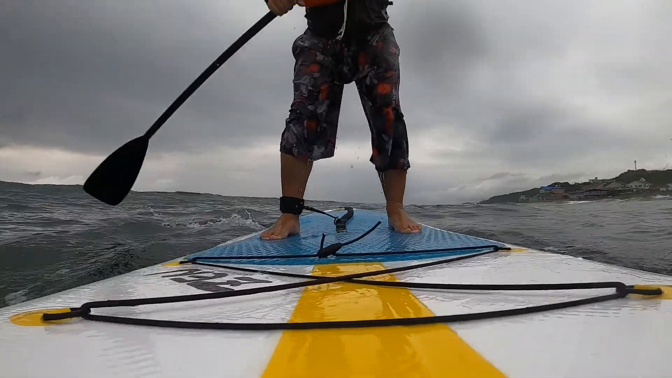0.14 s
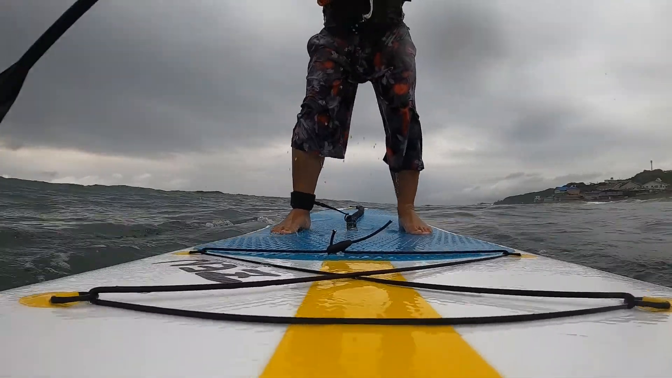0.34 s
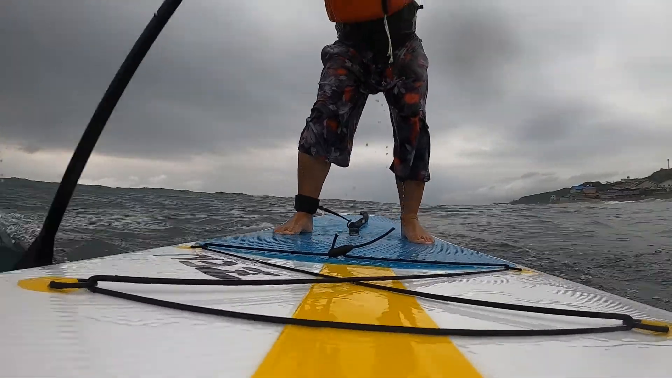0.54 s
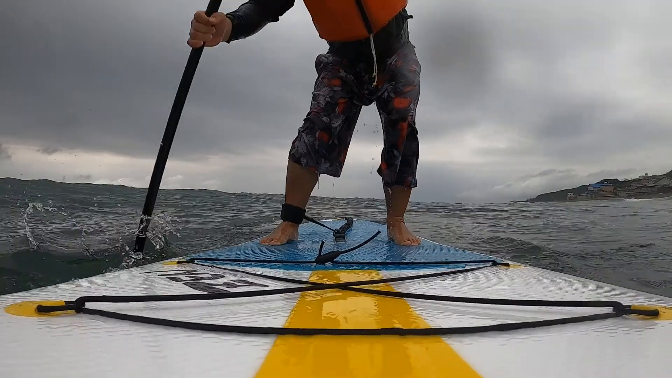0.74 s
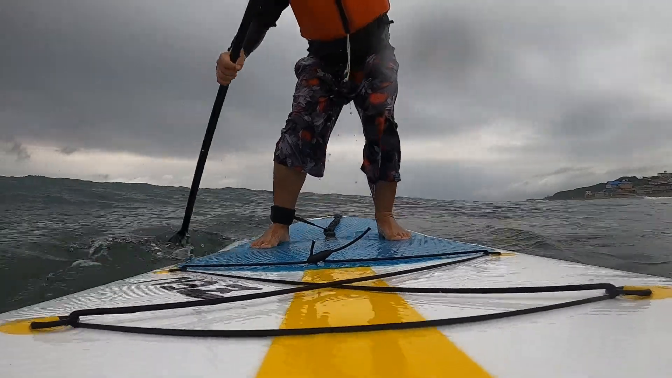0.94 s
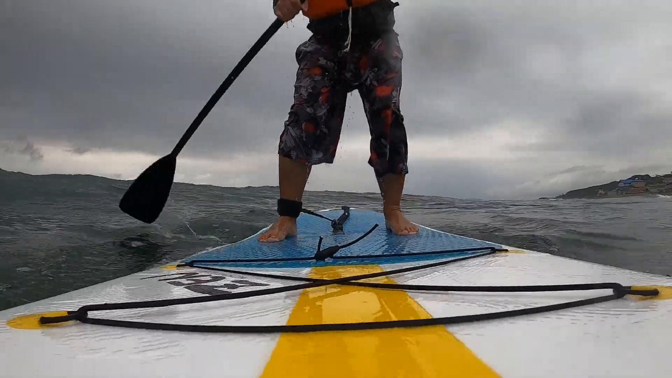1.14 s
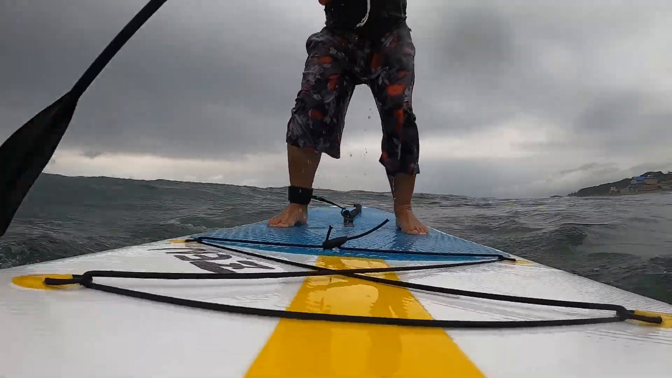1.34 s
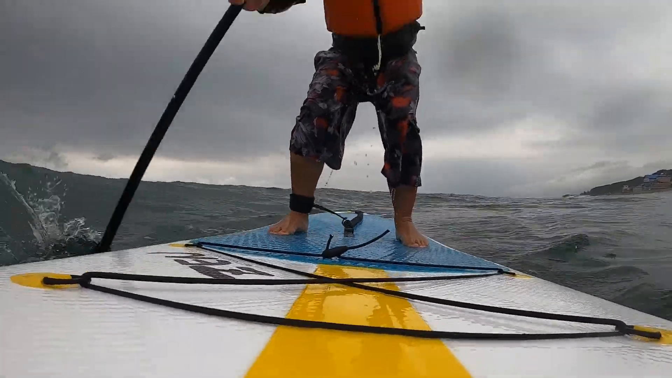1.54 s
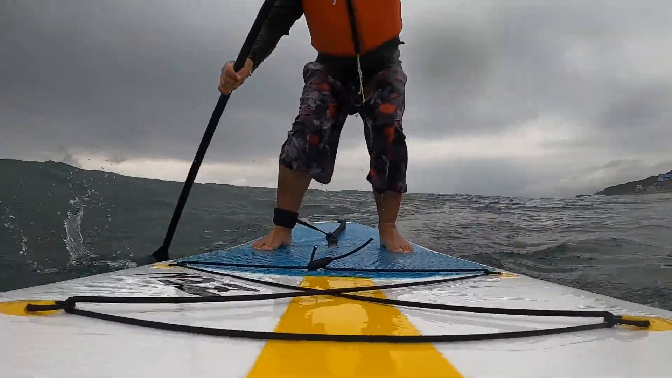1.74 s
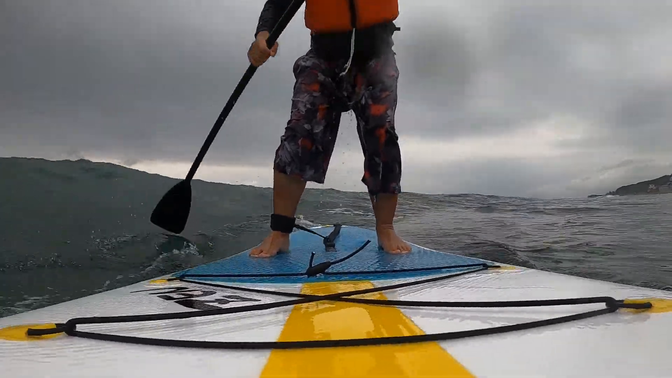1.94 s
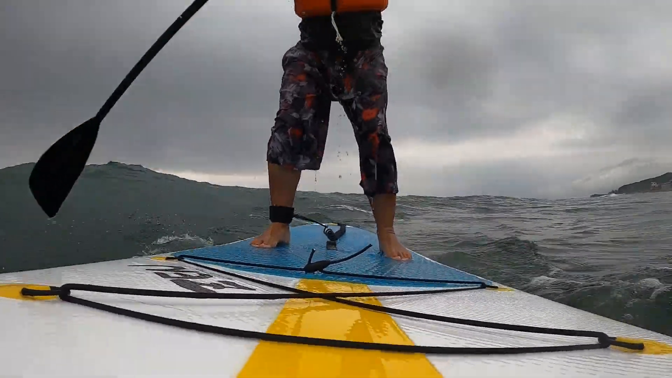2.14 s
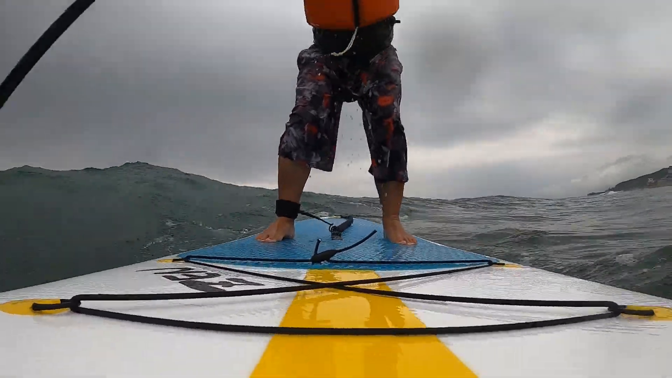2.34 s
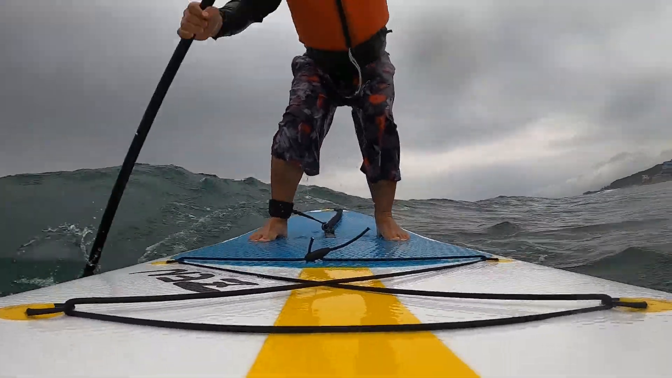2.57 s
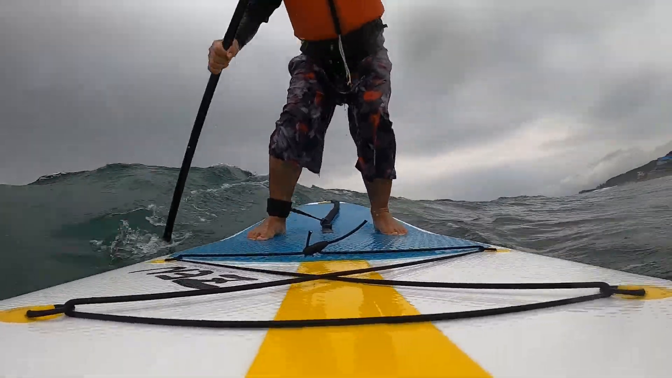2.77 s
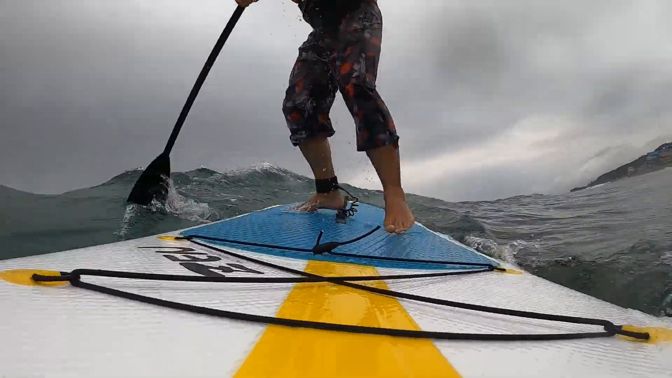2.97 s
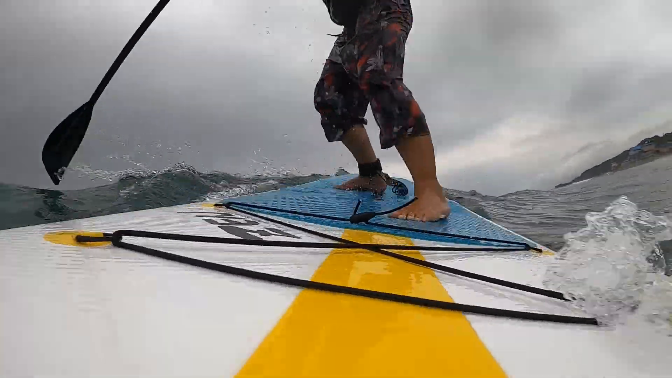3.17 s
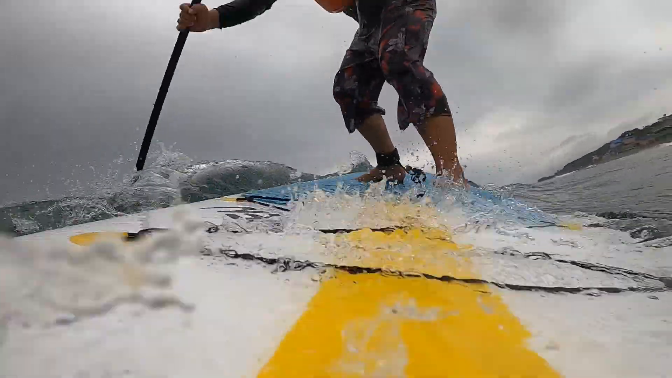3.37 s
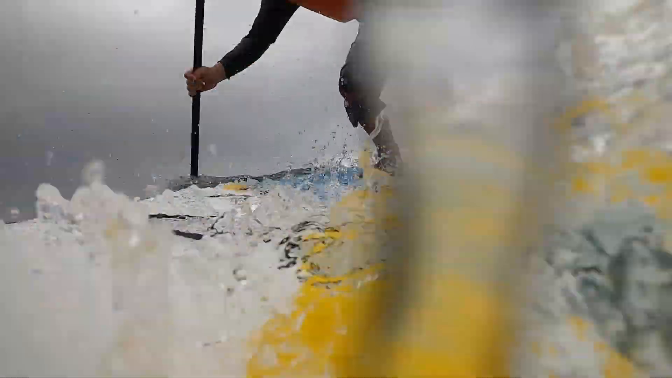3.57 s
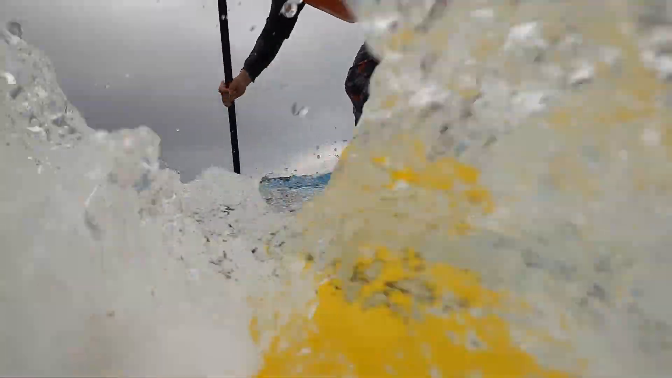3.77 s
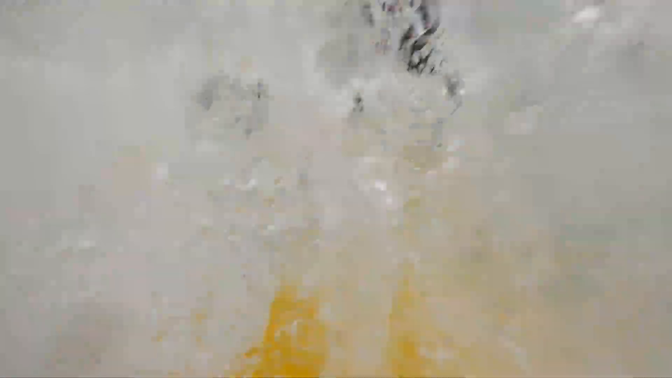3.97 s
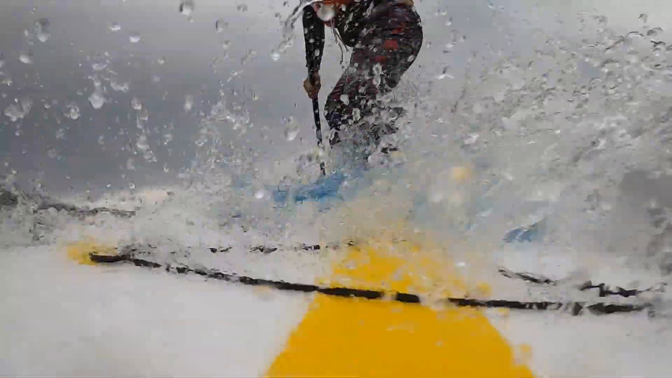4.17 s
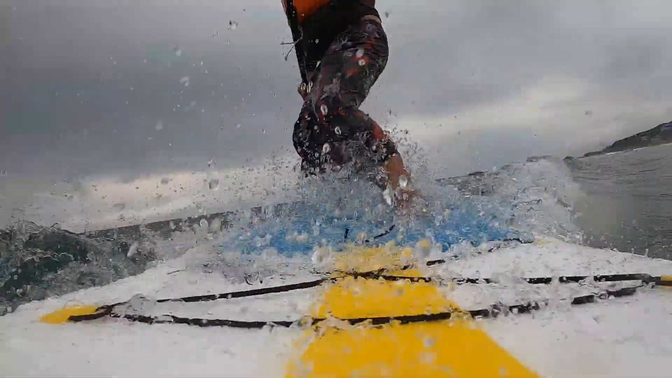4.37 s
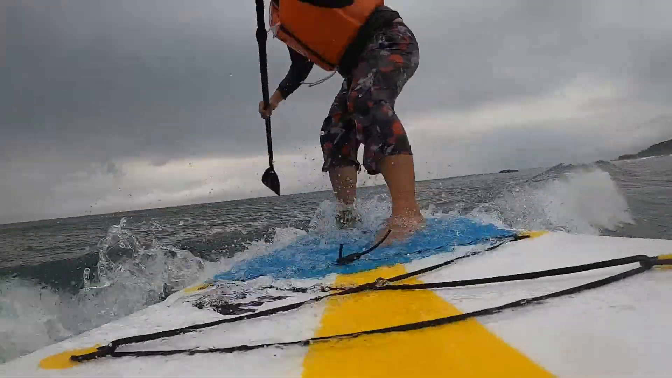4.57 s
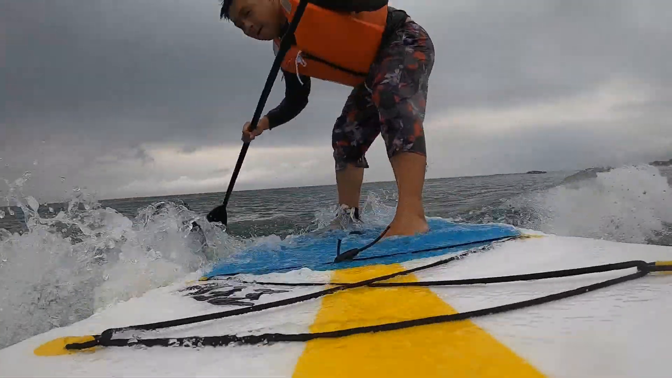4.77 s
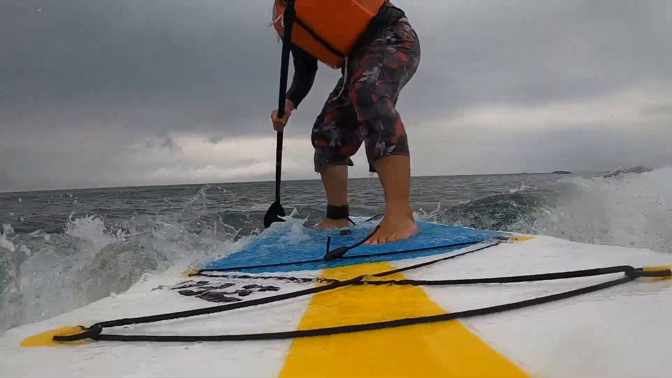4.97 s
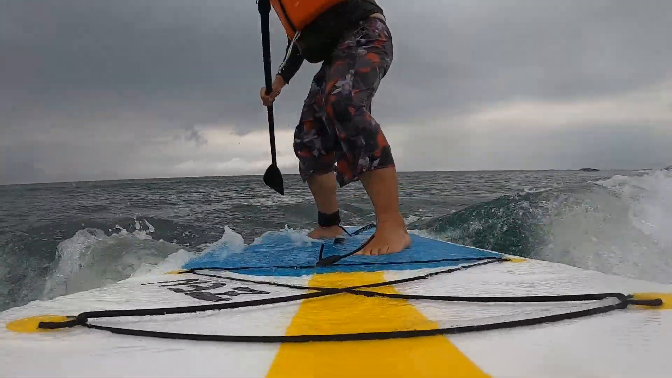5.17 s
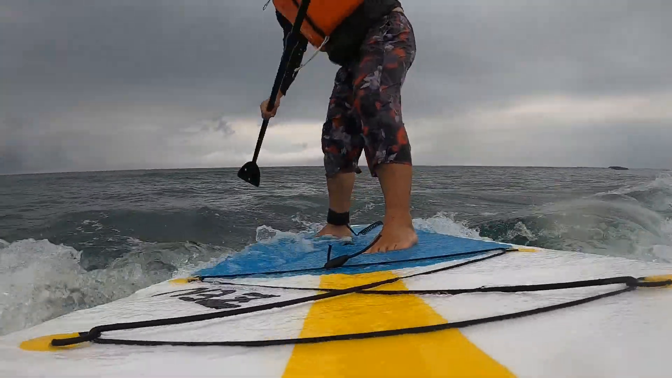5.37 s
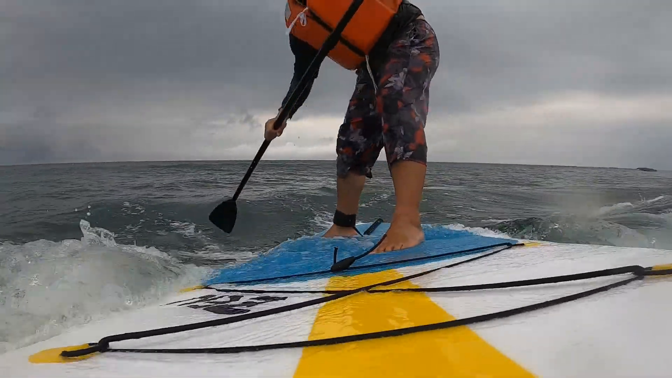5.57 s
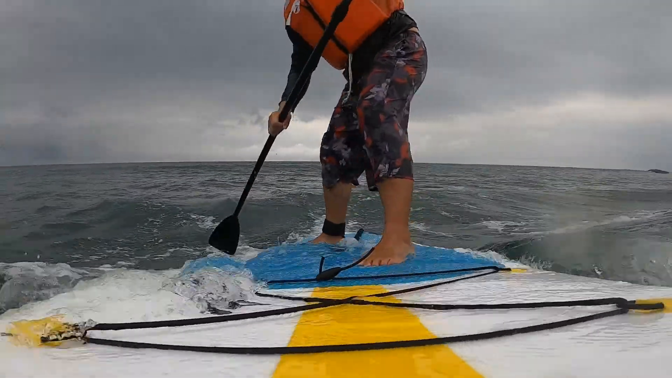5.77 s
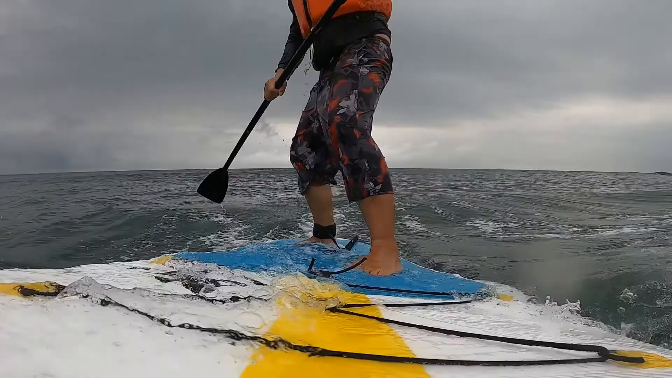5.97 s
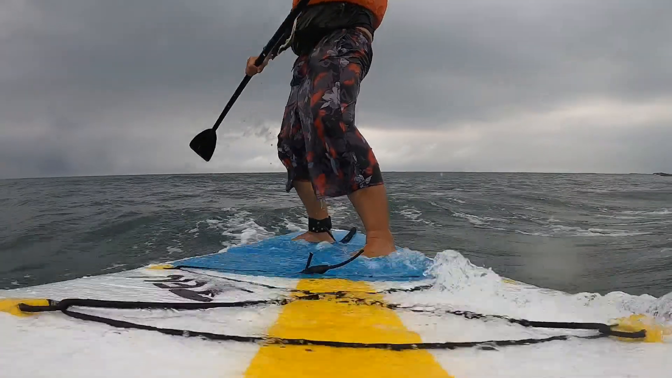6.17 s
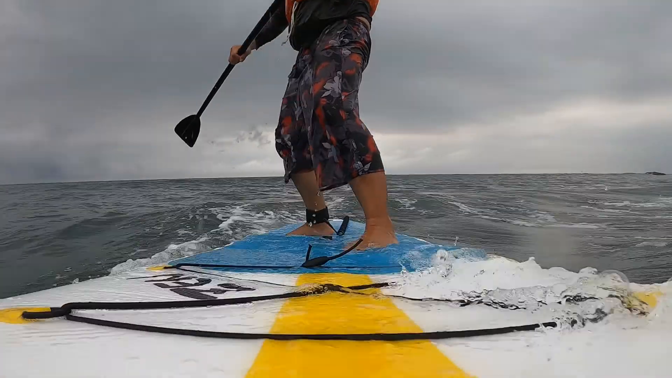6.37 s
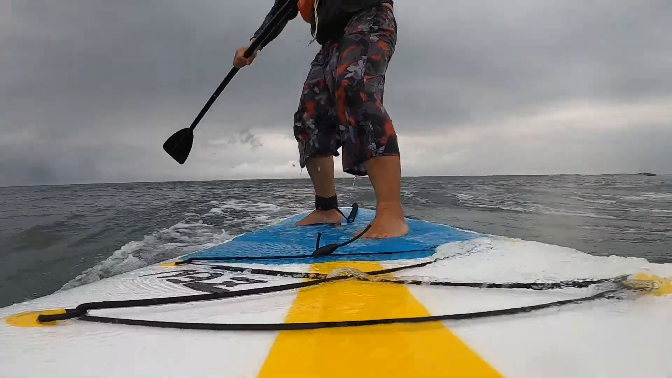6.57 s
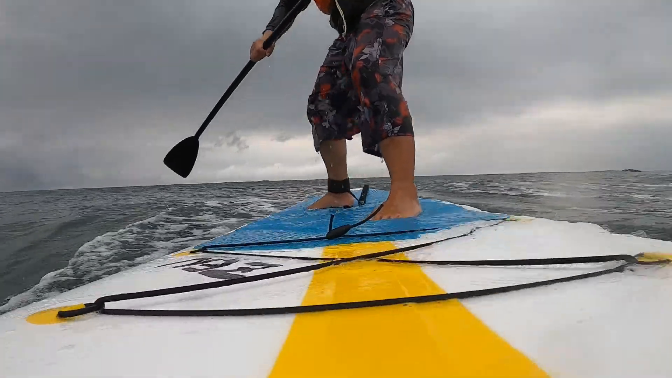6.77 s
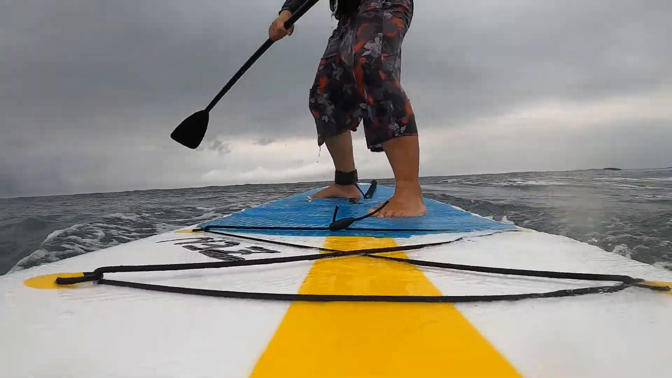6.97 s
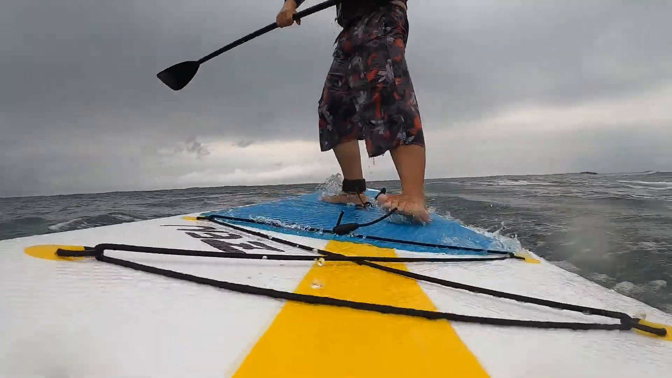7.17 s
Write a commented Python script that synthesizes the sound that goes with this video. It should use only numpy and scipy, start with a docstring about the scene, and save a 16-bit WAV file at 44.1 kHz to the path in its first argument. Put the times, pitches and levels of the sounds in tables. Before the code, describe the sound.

A microphone in a housing on the nose of a hollow paddleboard, outdoors on a choppy sea. From 0 to 3 seconds a mid-toned wash runs along the rails over uneven low drumming and gusty wind rumble. A hollow paddle plop comes at 0.2, bubbly surges and splashes around 1.0 to 1.3, smaller slaps near 1.6 to 1.9, another plop at 2.2, and hull gulps at 2.6 to 2.8. A fainter plop at 3.0 leads to the wave: from 3.35 sharp cracks, plinking drops and bright mist, a heavy slap near 3.67, then a dense fizzing surge around 4.0 to 4.1. By 4.3 tiny bubbles chirp upward and the treble has sunk. From 4.5 the muffled wash is quiet beneath wind and hollow thumps, notably 4.8 to 5.6 and 6.07. The wash gradually recovers, swelling at 6.7, with stronger drumming near 7 seconds and a last splash at the end.

```python
"""The hollow hull of a paddleboard drums under the water: shaped noise, and decaying tones for trapped air.
Wind buffets a microphone behind an open port in a housing on the nose; noise washes along the rails, foam fizzes.
A wave breaks over the nose: noise bursts make its splashes, ringing bubbles and drops its spray, grains its mist.
The wet ports muffle the wash until they drain; the recorder dulls the treble throughout."""
import sys
import numpy as np
from scipy import signal
from scipy.fft import rfft, irfft
from scipy.io import wavfile
from scipy.ndimage import uniform_filter1d

SR = 44100
rng = np.random.default_rng(int(sys.argv[2]) if len(sys.argv) > 2 else 0)


def put_to_file(sound):
    """Save the sound as 16-bit audio at rate SR, in the file named by the first command-line argument."""
    columns = np.atleast_2d(sound).T  # one column per channel
    safe = np.clip(columns, -1, 1)
    whole_steps = np.round(safe * 32767)
    wavfile.write(sys.argv[1], SR, whole_steps.astype(np.int16))


N = 317961
T = np.arange(N) / SR  # time of each sample [s]
F = np.arange(N // 2 + 1) * SR / N + 1e-3  # frequency of each bin [Hz], kept above zero for the logarithms
WAVE_START_S, WAVE_END_S = 3.3, 4.35  # while the wave is over the nose
PORT_FILLS_S = 3.42  # water fills the open microphone port


def undb(db):
    """Amplitude gain is ten to the power of a twentieth of the decibels."""
    return 10 ** (np.asarray(db) / 20)


def curves(table):
    """Envelopes by linear interpolation: each column after the time becomes one value a sample."""
    s, *columns = np.transpose(table)
    return [np.interp(T, s, column) for column in columns]


def walk(rate):
    """Band-limited random modulation: levels held 1 / rate s, smoothed twice, with standard deviation 1."""
    hold = int(SR / rate)
    steps = np.repeat(rng.standard_normal(N // hold + 1), hold)
    smooth = uniform_filter1d(uniform_filter1d(steps, hold), hold)[:N]
    return smooth / np.std(smooth)


def colour(x, spectrum):
    """Spectral shaping: the spectrum of x follows (Hz, dB) points and is scaled to a waveform rms of 1."""
    hz, db = np.transpose(spectrum)
    gain = undb(np.interp(np.log(F), np.log(hz), db, left=-120, right=-120))
    shaped = rfft(x) * gain
    return shaped * N / np.sqrt(2 * np.sum(np.abs(shaped) ** 2))  # Parseval's relation


def steady(shaped, hold_s):
    """Envelope normalisation: a spectrum becomes a waveform divided by its rms smoothed over hold_s."""
    x = irfft(shaped, N)
    hold = int(hold_s * SR)
    power = uniform_filter1d(uniform_filter1d(x ** 2, hold), hold)
    return x / np.sqrt(power)


def grains(per_s, scatter_db, share):
    """Shot noise: random impulses of uneven size take a share of the power, Gaussian noise the rest."""
    size_db = scatter_db * np.minimum(rng.exponential(1, N), 3)
    hits = (rng.random(N) < per_s / SR) * undb(size_db) * rng.choice([-1, 1], N)
    return np.sqrt(1 - share) * rng.standard_normal(N) + np.sqrt(share) * hits / np.std(hits)


def tilted(shaped, pivot_hz, slope_db, shared_db, own_db, rate, reach):
    """Time-varying filter bank: half-octave bands above a pivot tilt, surge together and flicker alone."""
    place = np.clip(2 * np.log2(F / pivot_hz), 0, len(reach) - 1)
    surge = walk(rate)
    out = np.zeros(N)
    for k, share in enumerate(reach):
        weight = np.clip(1 - np.abs(place - k), 0, 1)  # neighbouring bands crossfade
        band = irfft(shaped * weight, N)
        out += band * undb(slope_db * share + shared_db * surge + own_db * walk(rate))
    return out


def add(out, s, sound):
    """Linear superposition: a short sound joins the waveform at time s."""
    i = int(s * SR)
    out[i:i + len(sound)] += sound[:N - i]


def ring(hz, t60, glide, rise_s):
    """Damped resonance: a decaying tone whose pitch climbs by the share 2 * glide within t60."""
    t = np.arange(int(t60 * SR) + 1) / SR
    tone = np.sin(2 * np.pi * hz * t * (1 + glide * t / t60))
    decay = np.exp(-np.log(1000) * t / t60)  # 60 dB in t60
    return tone * decay * (1 - np.exp(-t / rise_s))


def burst(hz, octaves, t60, rise_s):
    """Impact noise: a band around a centre decays exponentially, led by a spike of first contact."""
    size = 8192
    t = np.arange(size) / SR
    f = F[1] + np.arange(size // 2 + 1) * SR / size
    noise = rng.standard_normal(size)
    noise[int(.0015 * SR)] += 9  # first contact
    band = np.exp(-(np.log2(f / hz) / octaves) ** 2) * np.sqrt(hz / f)
    noise = irfft(rfft(noise) * band)
    decay = np.exp(-np.log(1000) * t / t60)
    return noise / np.std(noise) / 2 * decay * (1 - np.exp(-t / rise_s)) ** 2


def hull():
    """Forced vibration: chop beats the hollow board in a dense patter with a lower and an upper resonance."""
    # level of the lower and the upper drumming: (time [s], level [dB])
    lower_levels, upper_levels = [(0.03, -23.5), (0.37, -27), (1.22, -22.5), (1.44, -27), (1.98, -21.5),
                                  (2.08, -25), (2.4, -25.5), (2.7, -24), (2.74, -28), (2.76, -21),
                                  (3.26, -24), (3.69, -23), (3.73, -28), (4.11, -19), (4.45, -33.5),
                                  (4.59, -20.5), (4.71, -21.5), (5.05, -17), (5.11, -27), (5.19, -23),
                                  (6.82, -22.5), (6.86, -28), (6.93, -19), (6.97, -15), (7.01, -26.5),
                                  (7.18, -18.5)], [(0.03, -25.5), (1.86, -29.5), (1.94, -21.5), (2.3, -31),
                                                 (2.36, -24.5), (3.43, -29), (3.45, -23), (3.69, -23),
                                                 (3.71, -29.5), (4.18, -20.5), (4.28, -28.5), (4.41, -35.5),
                                                 (4.51, -35), (4.55, -21), (4.59, -25), (4.63, -21),
                                                 (4.67, -25.5), (4.71, -21.5), (4.745, -26), (4.78, -27.5),
                                                 (4.84, -20), (5.04, -29), (5.13, -33), (5.29, -26),
                                                 (5.33, -41), (5.39, -25), (5.47, -36), (5.9, -27.5),
                                                 (6.88, -27.5), (6.94, -22), (7.0, -29), (7.18, -25.5)]
    # their spectra: (frequency [Hz], relative density [dB])
    lower_colour, upper_colour = [(140, -25), (200, -5.5), (250, 1.5), (320, 0.5), (380, -6.5),
                                  (450, -17.5)], [(300, -29), (380, 0.5), (480, -1), (570, -2.5),
                                                    (630, -18)]
    (low_db,), (high_db,) = curves(lower_levels), curves(upper_levels)
    lower = steady(colour(grains(300, 4.9, 0.37), lower_colour), 0.13)
    lower = lower * undb(low_db + 1.6 * walk(13))
    buried = (T > 3.45) & (T < 3.72)
    lean_db = np.where(buried, 15.5, -0.5)  # dB per octave: brighter while the nose is buried
    lean_db = uniform_filter1d(lean_db, size=900)
    upper = steady(colour(grains(500, 2.9, 0.16), upper_colour), 0.11)
    upper = tilted(rfft(upper), 420, lean_db, 0.98, 1.6, 18, (0, .5))
    return lower + upper * undb(high_db)


def wind():
    """Turbulent pressure: eddies press on the microphone as a deep buffeting and a quicker flutter."""
    # level of the buffeting and of the flutter: (time [s], level [dB])
    buffet_levels, gust_levels = [(0.03, -34), (0.25, -22), (0.36, -30), (0.68, -33.5), (0.8, -20),
                                  (1.1, -29.5), (1.4, -32), (1.54, -35), (1.68, -27), (1.84, -31),
                                  (1.92, -22), (2.08, -40), (2.28, -33), (2.4, -39.5), (2.88, -38),
                                  (2.99, -17), (3.1, -24.5), (3.45, -20.5), (3.58, -18.5), (3.72, -19.5),
                                  (3.82, -26.5), (4.0, -19.5), (4.15, -25), (4.6, -24), (4.85, -24.5),
                                  (5.05, -18), (5.3, -24), (5.5, -20.5), (5.8, -20.5), (6.2, -26),
                                  (6.8, -19), (7.18, -31.5)], [(0.03, -42), (0.11, -26.5), (0.55, -31), (1.01, -21),
                                                  (1.07, -37), (1.16, -22), (1.32, -28), (1.7, -32.5),
                                                  (1.93, -29.5), (2.1, -33), (2.64, -32), (2.98, -28),
                                                  (3.26, -35.5), (3.53, -20.5), (3.57, -30), (3.69, -16),
                                                  (3.81, -32), (3.89, -16), (4.01, -27.5), (4.11, -16),
                                                  (4.29, -24), (6.32, -23.5), (6.58, -29), (6.7, -23.5),
                                                  (7.18, -29)]
    # their spectra: (frequency [Hz], relative density [dB])
    deep_colour, flutter_colour = [(8.8, -42.5), (15, -14), (49, 2.5), (110, -9.5), (140, -25.5),
                                   (240, -120)], [(60, -23.5), (90, -2), (150, -4), (190, -6), (260, -21)]
    (deep_db,), (flutter_db,) = curves(buffet_levels), curves(gust_levels)
    deep = steady(colour(rng.standard_normal(N), deep_colour), 0.17)
    flutter = steady(colour(grains(150, 5.4, 0.33), flutter_colour), 0.097)
    return deep * undb(deep_db + 1.5 * walk(9.8)) + flutter * undb(flutter_db + 1.9 * walk(11))


def surges():
    """Superposed envelopes: each surge moves four controls along a rounded rise and fall."""
    # surges of water from paddle strokes, chop and the wave: (time [s], rise [s], fall [s], wash lift [dB],
    # further lift of its upper octave [dB], fizz lift before the spatter [dB], turn of treble slope [dB/octave])
    surge_events = [(0.016, .015, 0.022, 2.5, 5, 6, -12), (0.225, 0.2, 0.075, 6, 3, 9.5, -11),
                    (0.75, 0.035, 0.021, 9.5, -9, -2, 2), (0.98, 0.14, 0.11, 2, 2, 3.5, -9),
                    (1.12, 0.029, .04, 3.5, 2, -1, -6), (1.24, 0.2, 0.2, 5, 4, 6.5, -10),
                    (1.92, 0.074, 0.2, 4.5, 7, 0.5, -10.5), (2.21, 0.031, 0.056, -3.5, 7, 1, -8),
                    (2.71, 0.051, 0.05, 7, -3.5, 10, -11), (3.0, .04, 0.014, -5, 14.5, 11.5, -3),
                    (3.2, 0.056, 0.043, 3, 0.5, 11.5, -9), (3.385, 0.05, 0.058, 0, 14.5, 26.5, -10),
                    (3.445, 0.039, 0.026, 7, 6, 19, 8), (3.575, 0.017, 0.042, 6, 7.5, 11, 4.5),
                    (3.672, 0.061, 0.02, 21, -7, 15, 5), (3.74, 0.0255, 0.043, 1, -3, 5, -7),
                    (3.98, 0.044, 0.046, -2.5, 10, 11, 0), (4.01, .04, 0.028, 1.5, 1.5, 2.5, -2),
                    (4.055, 0.12, 0.06, 18, 10, 28.5, 1), (4.11, .03, 0.033, 10.5, 4, 10, 9.5),
                    (4.171, 0.021, 0.042, -1.5, 10.5, 8, 10.5), (4.28, 0.031, 0.043, 2, -2, 4, 6.5),
                    (4.49, .04, 0.035, 6, -4.5, 7, -5), (5.77, 0.083, .07, 2.8, 0, 4, -3),
                    (5.99, 0.04, 0.06, -0.5, 6, 5, -11), (6.7, 0.061, 0.19, 4, 2.5, 6, -12.5)]
    lifts = np.zeros((4, N))
    for s, rise, fall, *lift in surge_events:
        phase = np.interp(T, [s - rise, s, s + fall], [0, np.pi / 2, 0])
        lifts += np.outer(lift, np.sin(phase) ** 1.84)
    return lifts


def water():
    """Turbulent flow noise: a wash runs along the rails and its foam fizzes, both lifted by the surges."""
    # water between the surges, muffled once the ports are wet:
    # (time [s], wash level [dB], step to the octave above [dB], fizz level [dB])
    wash_levels = [(0.03, -31.5, -19, -68.5), (1.5, -30, -22.5, -65.5), (2.5, -30, -20, -64),
                   (2.9, -29.5, -18.5, -64), (3.3, -28, -14, -58.5), (3.45, -33.5, -17.5, -58),
                   (3.48, -39, -19, -57), (3.85, -37.5, -18, -64.5), (3.92, -25, -30.5, -66),
                   (4.1, -50, -22.5, -70.5), (4.24, -47, -18, -72.5), (4.3, -35.5, -24.5, -75.5),
                   (4.42, -39.5, -21, -72), (4.55, -41, -19.5, -75.5), (4.88, -47.5, -20.5, -80.5),
                   (4.97, -44, -18, -71), (5.12, -42, -20, -70), (5.7, -35.5, -18, -67),
                   (6.1, -32, -26, -70), (6.65, -31, -22, -66), (6.95, -34.5, -22, -70),
                   (7.18, -32, -21.5, -67.5)]
    # spectra of wash and fizz: (frequency [Hz], relative density [dB])
    wash_colour, fizz_colour = [(480, -29.5), (620, 4), (800, -2.5), (1000, -8.5), (1400, -18.5),
                                (2000, -28), (2800, -41.5)], [(1500, -15), (2200, 0), (3100, 0), (4000, -5), (5500, -15),
                                              (6800, -20), (10000, -28.5), (13000, -37)]
    # share of the octave step or slope taken by each half-octave band, lowest first: (share, ...)
    wash_reach, fizz_reach = (0, 0.86, 1, 1.1), (0, .5, 1, 1.5, 2)
    wash_db, fall_db, fizz_db = curves(wash_levels)
    wash_lift, step_lift, fizz_lift, turn = surges()

    step_db = fall_db + step_lift + 18  # the wash spectrum already holds a step of -18 dB
    wash = tilted(colour(grains(500, 10.0, 0.24), wash_colour), 670, step_db, 0.27, 1.6, 28, wash_reach)

    slope_db = np.where(T < PORT_FILLS_S, 0.5, 2) + turn  # dB per octave: port dry, then wet
    foam = grains(1200, 3.0, 0.17)
    foam += 0.19 * bubbles(count=380, low_hz=1500, high_hz=7300, cycles=8.1, scatter_db=5)
    fizz = tilted(colour(foam, fizz_colour), 3700, slope_db, 0.79, 1.8, 34, fizz_reach)
    # surging spray comes in uneven spurts: 0.11 dB of flicker per dB of lift
    spatter = 1 + 0.11 * (walk(71.2) - 3.0)
    return wash * undb(wash_db + wash_lift) + fizz * undb(fizz_db + fizz_lift * spatter)


def port(x):
    """Acoustic resonance: air in the open port colours the treble with a dip and a peak until water fills it."""
    # (centre [Hz], width [Hz], gain share)
    port_modes = [(2350, 280, -0.4), (2940, 180, 0.71)]
    colouring = sum(share * np.exp(-((F - hz) / width) ** 2) for hz, width, share in port_modes)
    openness = np.clip((PORT_FILLS_S - T) / 0.056, 0, 1)  # closes within 56 ms
    return x + openness * irfft(rfft(x) * colouring, N)


def swarms():
    """Bubble resonance: crowds of short rising tones, densest at their middle, fainter for small bubbles."""
    # bubbles churned up by the blade and the wave:
    # (time [s], rise [s], fall [s], level at the lowest pitch [dB], lowest pitch [Hz], highest pitch [Hz])
    swarm_events = [(.012, 0.011, 0.022, -39.5, 1600, 2220), (.21, 0.11, 0.065, -24, 700, 1500),
                    (.97, .1, .1, -28, 800, 1500), (1.19, .1, .1, -26, 800, 1500),
                    (1.28, .08, .13, -26, 800, 1600), (3.0, .04, .02, -35, 1000, 2200),
                    (3.19, .03, .03, -42, 1500, 4500), (3.39, .04, .05, -33, 1400, 5000),
                    (3.44, .03, .025, -38, 2500, 6500), (3.675, 0.046, 0.033, -37, 900, 4500),
                    (3.98, .035, .04, -40, 1200, 5500), (4.055, .05, .045, -35, 1200, 5500),
                    (4.1, .03, .035, -57, 3000, 6800)]
    cycles, scatter_db, tilt_db = 11, 15.5, -5.5  # ring length, level range [dB], dB per octave
    out = np.zeros(N)
    for s, rise, fall, db, low_hz, high_hz in swarm_events:
        for a, b, size, loud in rng.random((70, 4)):
            spread = a + b - 1  # triangular distribution from -1 to 1
            when = max(s + spread * (rise if spread < 0 else fall), 0)
            octaves = size * np.log2(high_hz / low_hz)
            hz = low_hz * 2 ** octaves
            gain = undb(db + tilt_db * octaves + scatter_db * (loud - .5))
            add(out, when, gain * ring(hz, cycles / hz, .08, 0.00042))
    return out


def plops():
    """Cavity resonance: the paddle blade makes hollow plops, narrow bands of noise that die away slowly."""
    # (time [s], level [dB], centre [Hz])
    plop_events = [(0.192, -14, 1080), (2.195, -20, 1200), (2.982, -23.5, 1580)]
    out = np.zeros(N)
    for s, db, hz in plop_events:
        add(out, s, undb(db) * burst(hz, octaves=0.18, t60=0.16, rise_s=0.002))
    return out


def air_pockets():
    """Trapped-air resonance: chop slaps the hull and each closing pocket gulps at a slightly rising pitch."""
    # (time [s], level [dB], starting pitch [Hz])
    slap_events = [(0.227, -5, 352), (1.179, -3, 160.8), (2.624, -5, 234), (2.763, -2.5, 307),
                   (2.838, -10, 298), (3.458, -2.5, 565), (3.658, -2.5, 266), (3.675, -10, 193),
                   (4.118, -19, 171), (4.145, -6.5, 404), (4.192, -5, 189), (4.325, -7, 216),
                   (4.6, -15, 300), (4.834, -7, 235), (4.865, -9, 400), (4.915, -10, 320),
                   (5.035, -9.5, 280), (5.269, -2.5, 270), (5.534, -16.5, 250), (5.632, -4, 232),
                   (6.069, -3, 162), (6.926, -12, 265)]
    out = np.zeros(N)
    for s, db, hz in slap_events:
        add(out, s, undb(db) * ring(hz, t60=0.055, glide=0.029, rise_s=0.004))
    return out


def drops():
    """Damped resonance: single drops plink with short, slightly rising tones."""
    # (time [s], level [dB], starting pitch [Hz], 60 dB decay [s])
    drop_events = [(.328, -53, 4440, .02), (0.73, -43, 2820, .02), (2.847, -51, 3150, .012),
                   (2.886, -51, 4200, .008), (3.093, -48, 3300, .008), (3.137, -46, 3000, .01),
                   (3.283, -39, 3155, .016), (3.359, -37, 6000, 0.0098), (3.378, -21.5, 3650, 0.032),
                   (3.404, -36, 4850, .04), (3.416, -22, 3050, .022), (3.419, -28, 4800, .008),
                   (3.437, -18, 3300, .009), (3.448, -28.5, 5630, 0.033), (3.455, -31.5, 5870, .02),
                   (3.499, -33.5, 3760, .018), (3.52, -35, 1410, 0.027), (3.537, -37, 4670, .014),
                   (3.573, -20, 1080, 0.018), (3.715, -15, 780, 0.018), (3.728, -17.5, 870, .02),
                   (3.889, -34, 2540, .011), (3.976, -39, 4300, .008), (4.191, -45, 960, 0.019),
                   (4.242, -54, 3360, .012), (4.61, -69, 2760, .012), (4.741, -68.5, 3030, 0.013)]
    out = np.zeros(N)
    for s, db, hz, t60 in drop_events:
        add(out, s, undb(db) * ring(hz, t60, glide=.02, rise_s=0.00059))
    return out


def splashes():
    """Impact noise: sheets of water crack on the housing and hiss away, more briefly during the wave."""
    # (time [s], level [dB], centre [Hz], half-width of the band [octaves])
    splash_events = [(1.044, -26.5, 1286, 0.33), (1.067, -40.5, 2300, 0.33), (1.112, -19, 900, 0.3),
                     (1.12, -46, 2000, .3), (1.236, -54, 4200, 0.4), (1.244, -51, 3600, .6),
                     (1.57, -41, 1394, 0.28), (1.71, -32, 1200, .35), (1.773, -37, 1590, .35),
                     (1.903, -23, 1300, 0.3), (3.0, -41.5, 3200, 0.55), (3.004, -54, 4500, .5),
                     (3.272, -52, 4000, .6), (3.355, -38, 2800, .5), (3.189, -33, 3090, 0.45),
                     (3.368, -26, 2600, 0.55), (3.375, -25, 2200, .7), (3.38, -12, 2400, 0.73),
                     (3.383, -16, 2000, .6), (3.389, -23, 2400, .7), (3.394, -22, 2600, .6),
                     (3.401, -16.5, 3580, 0.59), (3.41, -27, 3000, .6), (3.435, -30, 4500, .7),
                     (3.443, -17.5, 3500, 0.79), (3.45, -22, 2600, .9), (3.454, -32, 3000, 1),
                     (3.475, -34, 2000, .7), (3.485, -40, 2200, .9), (3.564, -26, 2090, 0.45),
                     (3.574, -17, 1800, 0.86), (3.61, -28, 1800, .4), (3.631, -37, 3120, .7),
                     (3.645, -36, 3200, 0.89), (3.654, -34, 3600, 0.75), (3.659, -31, 2300, .8),
                     (3.668, -31, 2200, .9), (3.677, -13, 1670, 0.57), (3.69, -33, 2000, .7),
                     (3.698, -35, 3000, .7), (3.727, -35, 1500, .6), (3.746, -31.5, 2100, .5),
                     (3.753, -39, 2000, .3), (3.76, -37, 3300, 0.69), (3.795, -38, 2700, 0.47),
                     (3.878, -51, 4000, .6), (3.937, -38, 2600, 0.43), (3.956, -32, 1800, .6),
                     (3.979, -22, 1300, .7), (3.988, -43, 4500, .8), (3.967, -38, 2600, 0.76),
                     (3.998, -36, 2700, .5), (4.009, -29, 2500, .9), (4.02, -26.5, 2200, .6),
                     (4.029, -26, 2800, 0.88), (4.043, -29, 2000, .7), (4.049, -24, 2200, .8),
                     (4.057, -26, 2500, .9), (4.065, -38, 3500, .6), (4.073, -38, 2600, .8),
                     (4.087, -44, 3000, .7), (4.099, -45, 2000, .8), (4.107, -43.5, 5400, .45),
                     (4.117, -46, 2200, .9), (4.159, -49, 6000, .25), (4.169, -52, 4000, .3),
                     (4.176, -44, 3200, .9), (4.182, -52, 4000, .4), (4.273, -53, 3480, 0.88),
                     (4.309, -58, 4030, 0.65), (5.41, -54.5, 1900, .35), (5.569, -51, 2600, .38),
                     (5.764, -41.5, 1900, 0.45), (5.98, -49, 2120, .5), (6.17, -56.5, 2800, .25),
                     (6.305, -52, 2700, .3), (6.385, -56, 2700, .3), (6.465, -52, 2700, .5),
                     (6.66, -52, 2100, .3), (6.705, -49, 1800, 0.34), (7.176, -31, 1350, 0.41)]
    out = np.zeros(N)
    for s, db, hz, octaves in splash_events:
        in_wave = WAVE_START_S < s < WAVE_END_S
        t60 = 0.016 if in_wave else 150 / hz  # splashes of chop hiss for 150 cycles
        add(out, s, undb(db) * burst(hz, octaves, t60, rise_s=0.00038))
    return out


def bubbles(count, low_hz, high_hz, cycles, scatter_db):
    """Bubble resonance: small bubbles burst at random while the wave breaks, ringing for a few cycles."""
    out = np.zeros(N)
    for place, size, loud in rng.random((count, 3)):
        hz = low_hz * (high_hz / low_hz) ** size
        when = WAVE_START_S + place * (WAVE_END_S - WAVE_START_S)
        add(out, when, undb(scatter_db * loud) * ring(hz, cycles / hz, .05, .0006))
    return out / np.std(out)


def mist():
    """Shot noise: tiny droplets thrown up by the wave pepper the housing in a bright, uneven crackle."""
    # (time [s], level [dB])
    mist_levels = [(3.33, -95), (3.36, -72), (3.385, -62), (3.402, -54), (3.413, -62), (3.43, -53),
                   (3.447, -46), (3.465, -59), (3.49, -68), (3.53, -84), (3.9, -91.5), (3.925, -72),
                   (3.95, -77), (3.975, -68), (4.02, -67), (4.055, -62), (4.09, -69), (4.125, -70),
                   (4.14, -79), (4.2, -95.5)]
    # (frequency [Hz], relative density [dB])
    mist_colour = [(3000, -20), (4500, -2), (6300, -0.5), (7500, -2.5), (10000, -4), (12000, -11.5),
                   (14500, -22)]
    s, db = np.transpose(mist_levels)
    level_db = np.interp(T, s, db, left=-150, right=-150)
    crackle = irfft(colour(grains(1500, 4.0, .35), mist_colour), N)
    return crackle * undb(level_db + 2.5 * walk(120))


def rising_bubbles():
    """Bubble resonance: bubbles squeezed up through the draining water chirp steeply upwards."""
    # (time [s], level [dB], starting pitch [Hz], 60 dB decay [s], half the share the pitch climbs in that decay)
    chirp_events = [(4.299, -43, 1540, 0.02, 0.5), (4.304, -46, 1800, .016, .3)]
    out = np.zeros(N)
    for s, db, hz, t60, glide in chirp_events:
        add(out, s, undb(db) * ring(hz, t60, glide, rise_s=0.00059))
    return out


def scene():
    """Linear superposition: all sources meet at one microphone, the water through its port."""
    board = hull() + air_pockets()
    spray = plops() + drops() + splashes() + mist()
    return (board + wind() + port(water()) + swarms() + spray + rising_bubbles())[None]


def record(dry):
    """Linear filtering: the recorder lowers the treble above 6.9 kHz, adds faint hiss and cuts the top."""
    shelf_hz, shelf_db, hiss_db, top_hz = 6900, -10, -99, 14000
    low = signal.sosfiltfilt(signal.butter(16, shelf_hz, fs=SR, output="sos"), dry)
    dulled = low + undb(shelf_db) * (dry - low)
    hissing = dulled + undb(hiss_db) * rng.standard_normal(dry.shape)
    return signal.sosfilt(signal.ellip(8, .2, 70, top_hz, fs=SR, output="sos"), hissing)


dry = scene()
out = record(dry)
put_to_file(out)
```